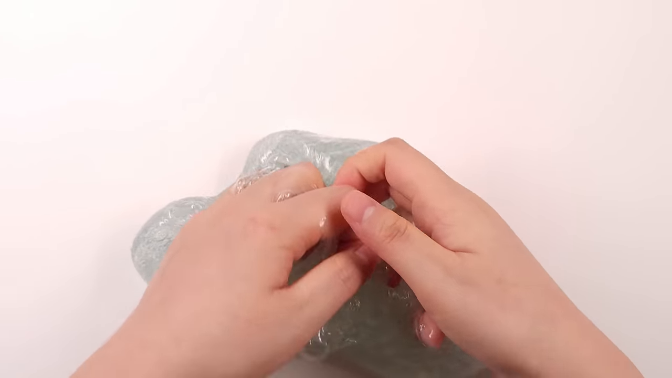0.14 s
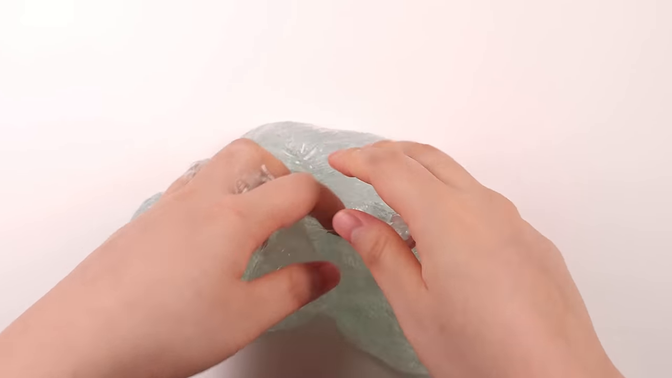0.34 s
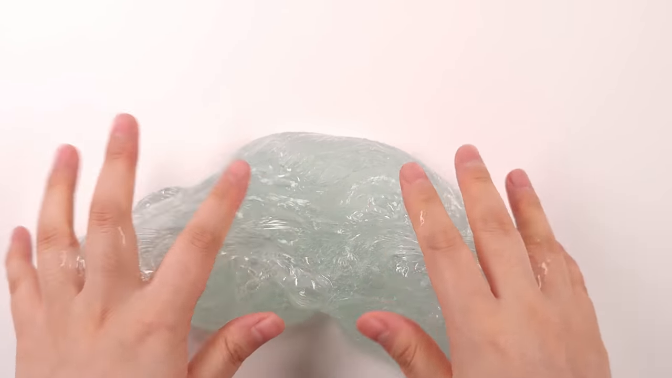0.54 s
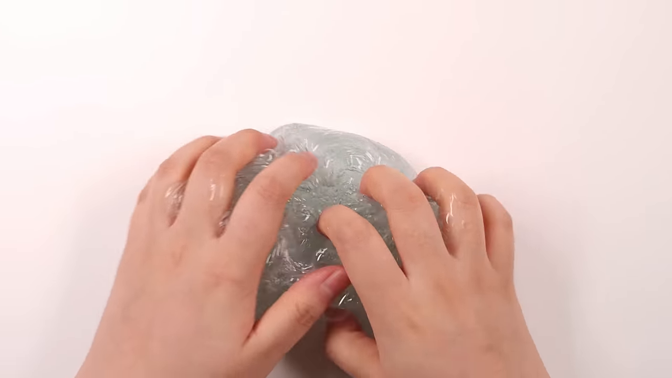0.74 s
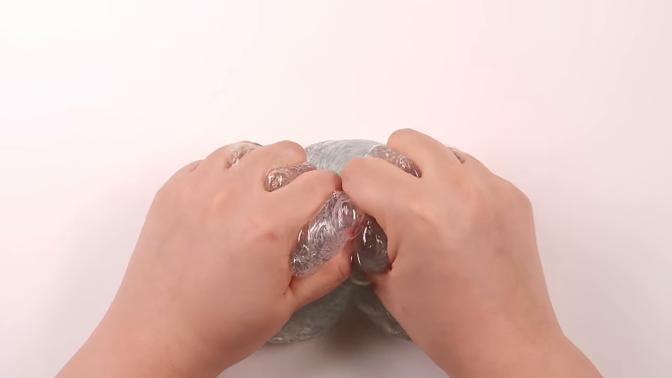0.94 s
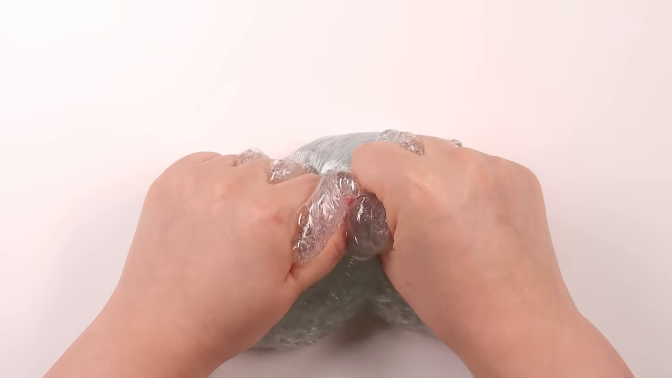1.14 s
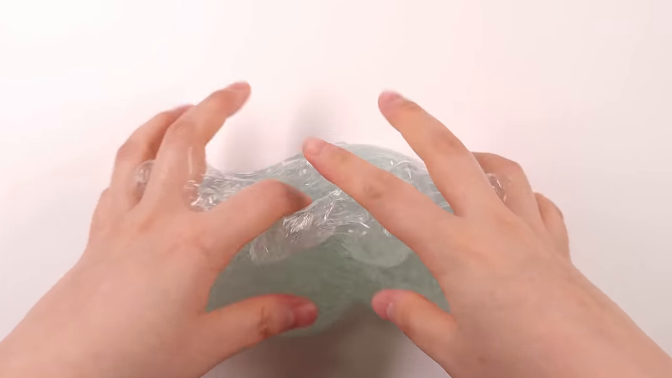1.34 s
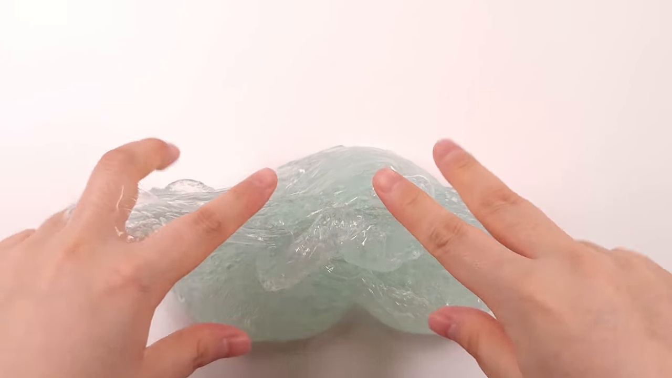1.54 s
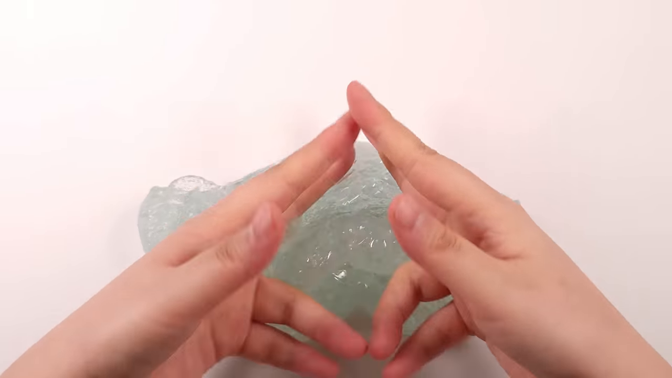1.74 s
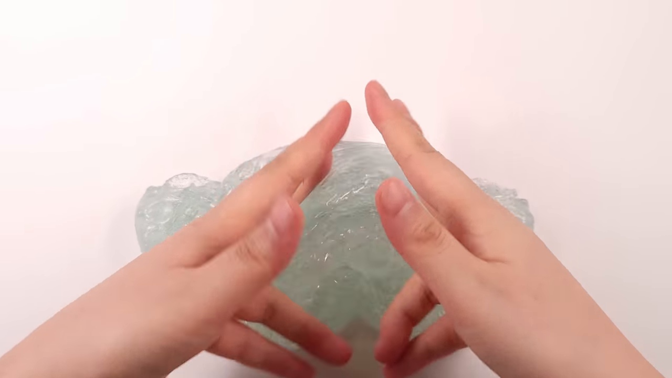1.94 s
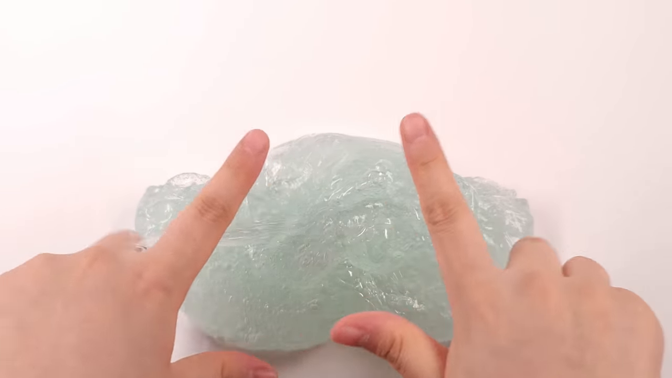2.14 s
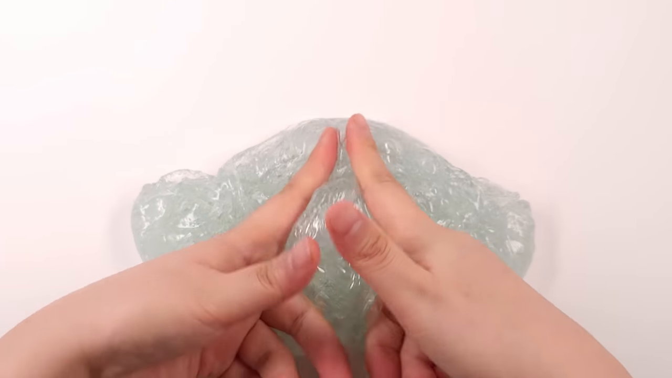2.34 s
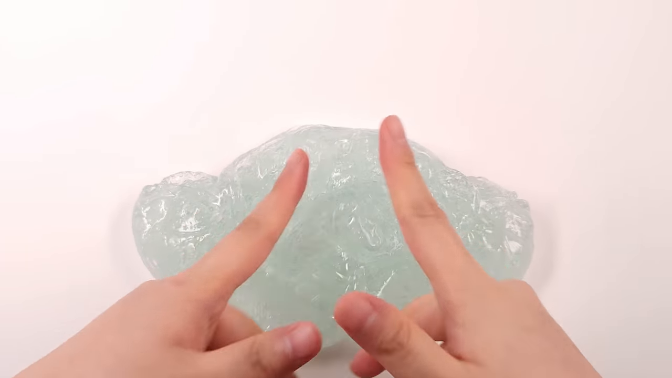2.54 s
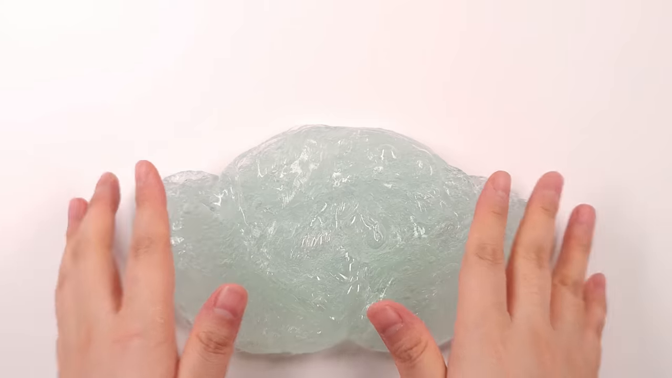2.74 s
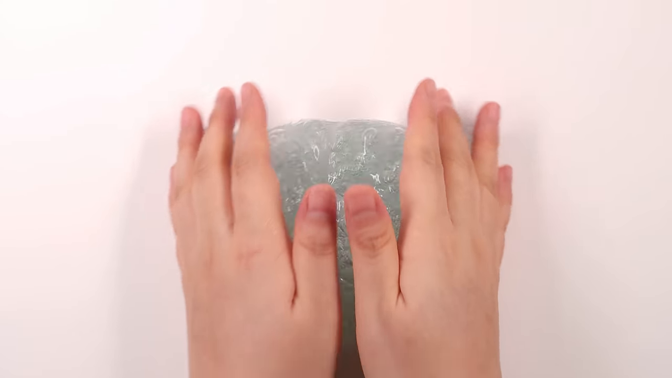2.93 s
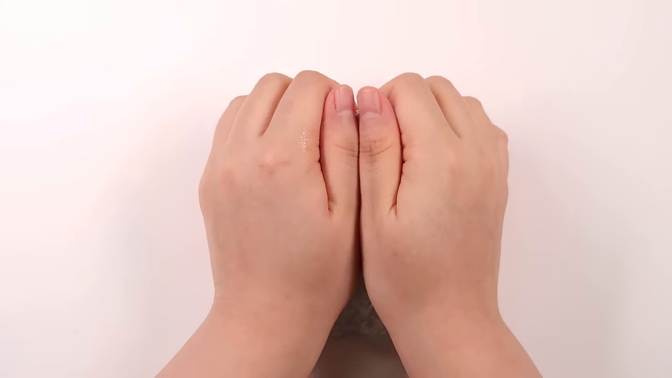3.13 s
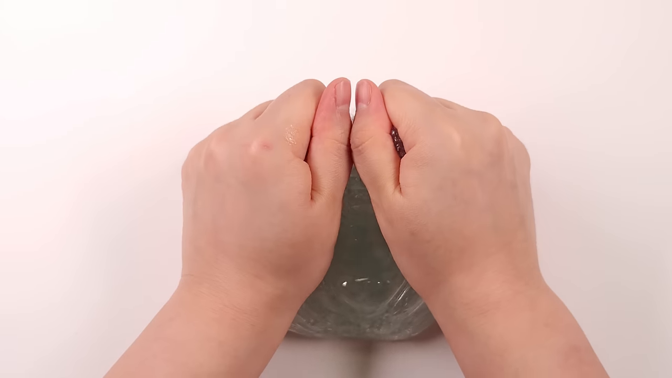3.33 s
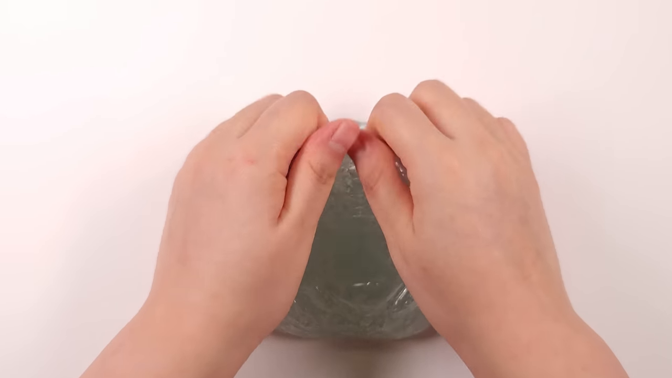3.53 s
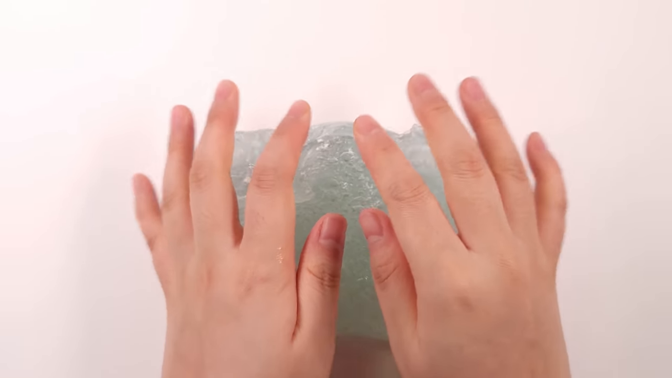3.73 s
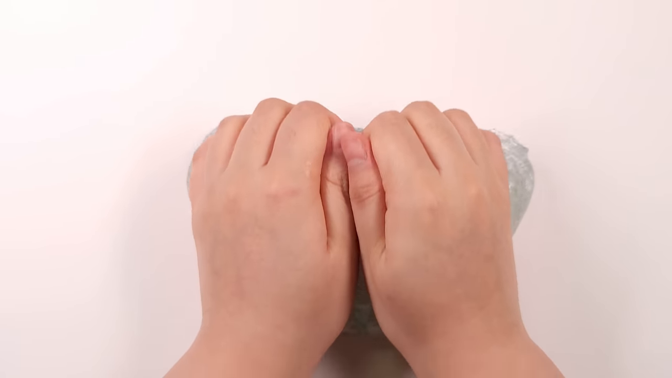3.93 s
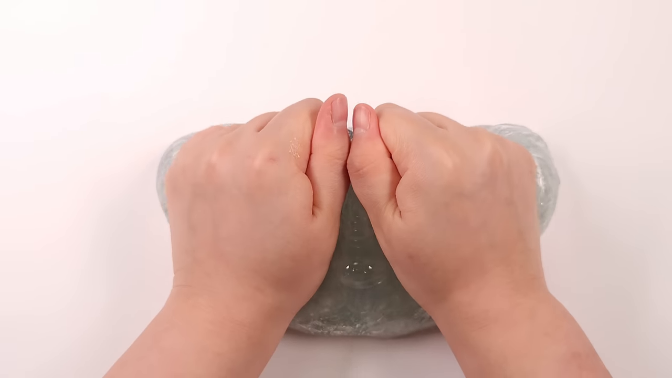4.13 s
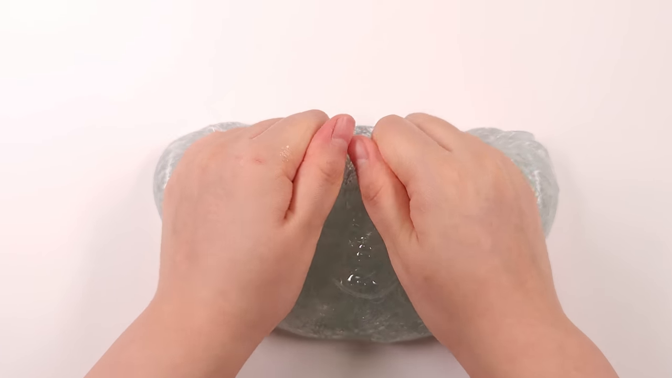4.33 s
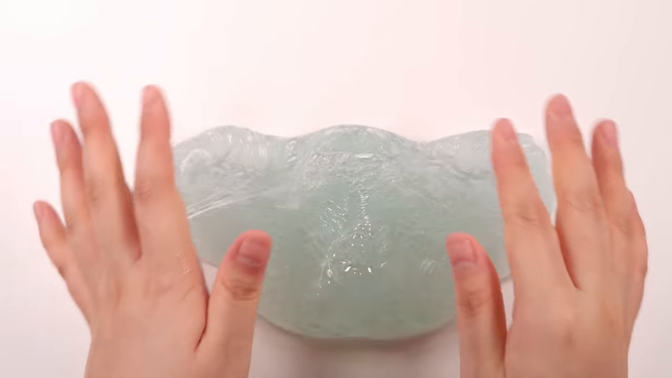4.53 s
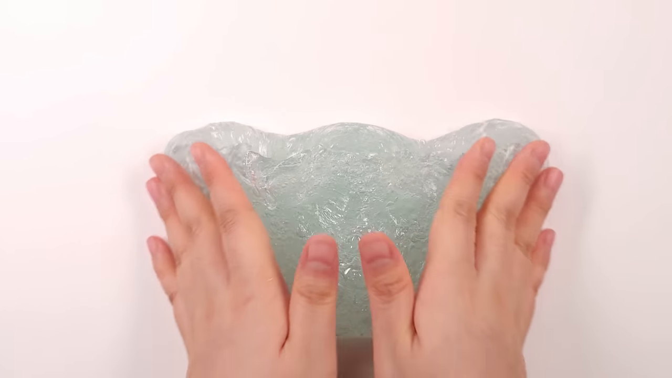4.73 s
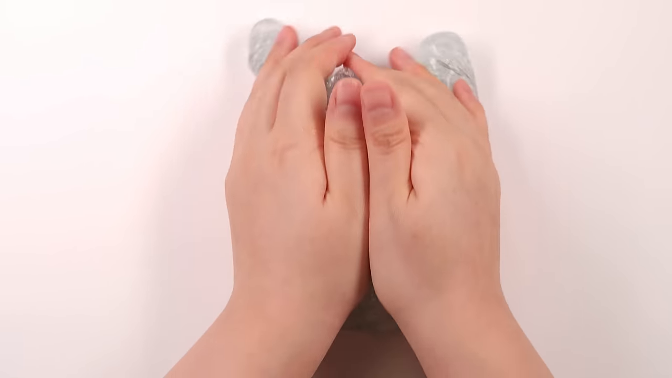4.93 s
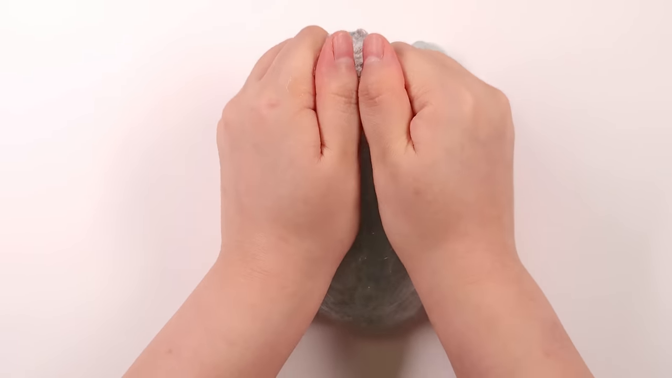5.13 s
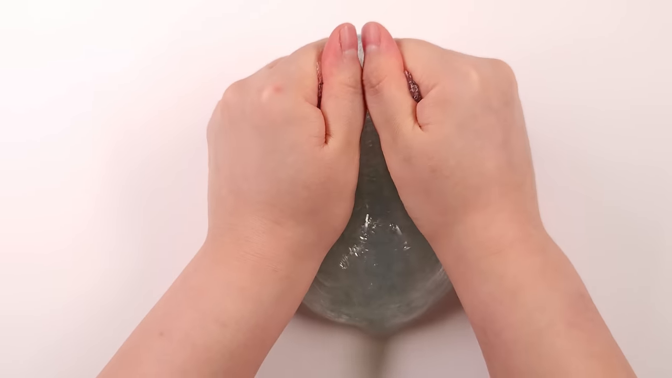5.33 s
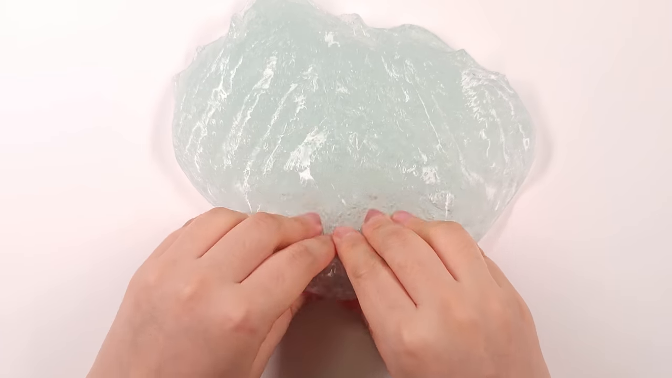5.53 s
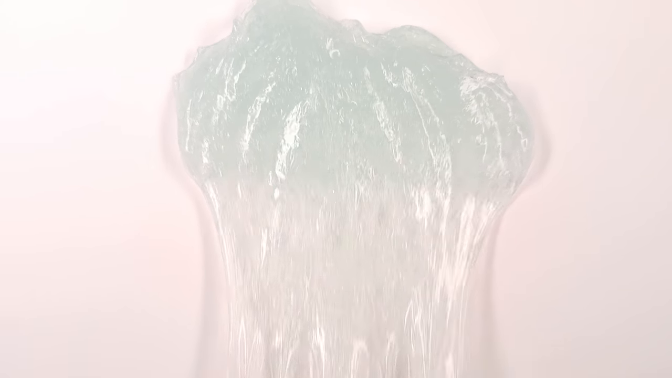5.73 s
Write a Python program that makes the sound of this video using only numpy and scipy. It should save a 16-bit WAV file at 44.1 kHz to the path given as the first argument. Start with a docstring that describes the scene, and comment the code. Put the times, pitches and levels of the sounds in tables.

```python
"""On a table in a small quiet room, two hands squeeze, fold and stretch sticky slime close to the microphone.
Trapped air bursts in sharp pops and squirts: a short snap or a run of flaps sets a small air cavity ringing.
Countless random tiny bubbles and threads crackle as the fingers sink in and peel off.
Large air pockets give soft low thuds, and the mass rumbles and rustles as it shifts under the palms.
Near the end the sound breaks off abruptly, then resumes for the last stretch, over a steady faint room hush."""
import sys
import numpy as np
from scipy import signal
from scipy.fft import rfft, irfft
from scipy.io import wavfile
from scipy.ndimage import uniform_filter1d

SR = 44100
rng = np.random.default_rng(int(sys.argv[2]) if len(sys.argv) > 2 else 0)


def wrap_up_sound(samples):
    """Save the sound to the file named by the first command line argument, as 16-bit audio."""
    columns = np.atleast_2d(samples).T
    # keep every value between -1 and 1, then stretch to whole-number steps
    tamed = np.clip(columns, -1, 1)
    steps = np.round(tamed * 32767).astype(np.int16)
    wavfile.write(sys.argv[1], SR, steps)


N = 258867
TIME = np.arange(N) / SR
BREAK_S, RESUME_S = 5.413, 5.43  # all but the hush breaks off, then resumes
EDGE_HZ = 16050  # upper limit of the sound


def gain_of(db):
    """Turns decibels into amplitude."""
    return 10 ** (np.asarray(db) / 20)


def evened(x):
    """Scales a sound to an average strength (rms) of 1."""
    return x / np.sqrt(np.mean(x ** 2) + 1e-20)


def per_ms(x):
    """Scales a click to the energy of one millisecond at rms 1."""
    return x / np.sqrt(np.sum(x ** 2) / (SR / 1000) + 1e-20)


def read(points, hz):
    """Reads between the points of a table, with pitch spaced as the ear hears it (log frequency)."""
    f, value = np.transpose(points)
    return np.interp(np.log(hz + 1), np.log(f + 1), value)


def coloured(x, points):
    """Makes each pitch range louder or softer, following a table of (frequency [Hz], level [dB])."""
    gains = gain_of(read(points, np.fft.rfftfreq(len(x), 1 / SR)))
    return irfft(rfft(x) * gains, len(x))


def high_pass(x, hz):
    """Takes away the bass below hz."""
    return signal.lfilter(*signal.butter(2, hz, "high", fs=SR), x)


def add(mix, s, sound):
    """Adds a sound into the mix at time s, cut where the mix ends."""
    part = mix[max(round(s * SR), 0):][:len(sound)]
    part += sound[:len(part)]


# colour of the still room: (frequency [Hz], relative level [dB])
HUSH_COLOUR = [(15, -27.5), (32, 3), (58, -6.5), (80, 7.5), (114, -6.5), (300, -28), (863, -31),
               (2110, -37), (3520, -27.5), (5200, -25.5), (7500, -36), (16000, -40)]


def hush(level_db=-61.5):
    """Low rumble and faint hiss of the still room: steady noise, strongest in the bass."""
    return gain_of(level_db) * evened(coloured(rng.standard_normal(N), HUSH_COLOUR))


# every movement swells from ENTRY_DB below its level, sags while held and dies away as the slime settles
ENTRY_DB, SAG_DB_PER_S, RELEASE_DB_PER_S = -25, 30.5, 273.5
# a much fainter, slower fade follows each movement
SETTLE_DB, SETTLE_DB_PER_S = -33.5, 109.5


def movement(start, swell_s, hold_s, db):
    """Power of one hand movement over time: swell, hold, release, faint settling."""
    t = TIME - start
    since_release = np.maximum(t - swell_s - hold_s, 0)
    rise_db = ENTRY_DB * np.maximum(1 - t / max(swell_s, .001), 0)
    sag_db = -SAG_DB_PER_S * np.maximum(t - swell_s, 0)
    settling_db = SETTLE_DB - SETTLE_DB_PER_S * since_release
    release_db = np.maximum(-RELEASE_DB_PER_S * since_release, settling_db)
    level_db = np.maximum(db + rise_db + sag_db + release_db, -150)
    # a movement begun before the break stops there
    sounding = (t > 0) & ((TIME < BREAK_S) | (start > BREAK_S))
    return sounding * gain_of(level_db) ** 2


# fingers sinking in or peeling off: (start [s], swell [s], hold [s], relative level [dB],
# brightness [dB], share of low squelch [dB])
FINGER_STROKES = [(0.002, 0.0012, 0.0064, -52.5, -4.5, 0), (0.173, 0.018, 0.17, -62, -2.5, -2),
                  (0.308, 0.16, 0.062, -38.5, -2, 0.5), (0.611, 0.043, 0.017, -48, 2, -4),
                  (0.802, 0.046, 0.16, -55.5, 1.5, -5.5), (0.989, 0.039, 0.003, -26, -2.5, -16.5),
                  (1.064, 0.027, 0.085, -39.5, 3, -12.5), (1.168, 0.014, 0.0059, -35.5, -4.5, 1),
                  (1.209, 0.0043, 0.0058, -35, -6, -4.5), (1.313, 0.036, 0.038, -35.5, -2, -5.5),
                  (1.367, 0.042, 0.01, -33, -3.5, 4), (1.432, 0.024, 0.067, -44.5, 1, -1.5),
                  (1.902, 0.01, 0.0069, -48.5, -4, 4.5), (2.018, 0.049, 0.029, -45.5, 2.5, -4),
                  (2.453, 0.013, 0.02, -48.5, -4, 6.5), (2.572, 0.054, 0.029, -41.5, 0.5, -5.5),
                  (2.82, 0.019, 0.015, -57.5, -2.5, 2), (3.032, 0.002, 0.03, -35.5, 0, -8.5),
                  (3.08, 0.029, 0.0051, -32, 4, -5.5), (3.157, 0.041, 0.072, -36, 0.5, -10),
                  (3.31, 0.008, 0.075, -35, 0, -7.5), (3.404, 0.025, 0.0068, -27, 0.5, -11.5),
                  (3.467, 0.0068, 0.067, -41.5, 11, -18.5), (3.609, 0.056, 0.069, -37.5, 0, -0.5),
                  (4.01, 0.029, 0.037, -55.5, -0.5, -4), (4.109, 0.0018, 0.005, -39, -5.5, -1.5),
                  (4.138, 0.0056, 0.074, -47.5, -4.5, 1), (4.208, 0.0017, 0.012, -32, -2, 3),
                  (4.25, 0.0079, 0.022, -28.5, -2.5, -11.5), (4.29, 0.013, 0.018, -41, -4, -8.5),
                  (4.44, 0.041, 0.1, -39.5, 0, 0), (4.895, 0.15, 0.019, -39, -4.5, 4.5),
                  (5.118, 0.0042, 0.091, -43.5, -1, 1), (5.244, 0.003, 0.026, -37.5, -2, -1),
                  (5.624, 0.0028, 0.015, -52.5, 2, 13), (5.664, 0.069, 0.073, -41.5, -1, 5)]
# when the fingers are lifted and the crackle is still: (lifted [s], back [s])
FINGERS_LIFTED = [(1.55, 1.9), (2.18, 2.43)]


def kneading(resting_db=-73.5, large_tilt=1.0, small_tilt=0.049):
    """Strength of squelch, large bubbles, small bubbles and fizz; bright strokes favour the finest bubbles."""
    lifted = sum((TIME > up) & (TIME < down) for up, down in FINGERS_LIFTED)
    # resting fingers keep a very faint crackle going
    power = np.full((4, N), gain_of(resting_db) ** 2)
    for start, swell_s, hold_s, db, bright_db, low_db in FINGER_STROKES:
        shares_db = [low_db, -large_tilt * bright_db, small_tilt * bright_db, bright_db]
        shares = gain_of(shares_db) ** 2
        power += shares[:, None] * movement(start, swell_s, hold_s, db)
    touching = 1 - uniform_filter1d(lifted * 1., size=1024)
    return np.sqrt(power) * touching


def clumps(smoothing_s=0.0038, depth_db=2):
    """Quick random surges and lulls as the skin sticks and slips, shared by bubbles of all sizes."""
    size = round(smoothing_s * SR)
    surge = uniform_filter1d(rng.standard_normal(N), size)
    surge = evened(uniform_filter1d(surge, size))
    return evened(gain_of(depth_db * surge))


def ring(hz, q, size=4096, glide=0.064):
    """An air cavity that swells as it opens and dies away in q cycles or so, its pitch rising as it shrinks."""
    hz = min(hz, EDGE_HZ)
    cycles = hz * np.arange(size) / SR
    age = np.pi * cycles / max(q, .5)
    # the pitch glides from a little below hz to a little above
    turns = np.cumsum(1 + glide * np.tanh(age - 2)) * hz / SR
    return per_ms(cycles * np.exp(-age) * np.sin(2 * np.pi * turns))


def bursts(per_s, spread_db):
    """Random instants of bursting, most small and a few large."""
    sizes = gain_of(spread_db * np.minimum(rng.exponential(1, N), 3.6))
    return sizes * (rng.random(N) < per_s / SR)


def bubbles(low_hz, high_hz, per_s, spread_db, q, count=22):
    """Cavities of many sizes, each size bursting and ringing at its own random instants."""
    out = np.zeros(N)
    for hz in np.geomspace(low_hz, high_hz, count):
        out += signal.oaconvolve(bursts(per_s / count, spread_db), ring(hz, q))[:N]
    return evened(out)


def threads(ticks, low_hz, high_hz):
    """Threads of slime parting from the skin: tiny dry ticks, kept to one pitch range."""
    band = signal.butter(2, [low_hz, min(high_hz, EDGE_HZ)], "band", fs=SR)
    return evened(signal.lfilter(*band, ticks))


# colour of the fine crackle: (frequency [Hz], level [dB])
FINE_COLOUR = [(30, -20.5), (70, 6), (120, -1.5), (300, -1.5), (450, -9.5), (700, -4), (2200, -3),
               (4000, 4.5), (7000, 0.5), (9300, -5), (12000, 5), (16000, -4)]


def crackle(small_db=-3.5, fizz_db=0.5, thread_db=-12, stray_db=-5.0):
    """Kneading bursts bubbles of all sizes and parts sticky threads, over the slow squelch of the mass."""
    squelch, large, small, fizz = kneading() * clumps()
    ticks = bursts(per_s=590, spread_db=2.5) * rng.standard_normal(N)
    thread = gain_of(thread_db)
    # a few bubbles lie right at the surface and burst clear of the rest
    strays = small * bubbles(1000, 6700, per_s=80, spread_db=4.5, q=2.6, count=12)
    large_mix = bubbles(427, 2053, per_s=1000, spread_db=3.5, q=3.33) + thread * threads(ticks, 370, 2600)
    small_mix = bubbles(2300, 6700, per_s=1200, spread_db=1.0, q=4.4) + thread * threads(ticks, 2900, 5300)
    fizz_mix = bubbles(7400, 14000, per_s=1600, spread_db=3.5, q=1.9) + thread * threads(ticks, 7000, 16000)
    out = squelch * bubbles(115, 430, per_s=900, spread_db=3.0, q=2.43)
    out += large * large_mix
    out += gain_of(small_db) * small * small_mix
    out += gain_of(fizz_db) * fizz * fizz_mix
    return coloured(out, FINE_COLOUR) + gain_of(stray_db) * strays


def snap(low_hz, high_hz=9000, tear_s=0.0004, size=512):
    """The film gives way: one sharp pulse and a brief ragged tear, with little bass."""
    t = np.arange(size) / SR
    burst = rng.standard_normal(size) * np.exp(-t / tear_s)
    burst[2] += 1
    burst = signal.lfilter(*signal.butter(1, high_hz, fs=SR), burst)
    return per_ms(high_pass(burst, low_hz))


def scatter(echo_db, fade_s, first_s=0.00054, size=600):
    """The direct path and a spray of echoes from the nearby hands, new for each pose."""
    t = np.arange(size) / SR
    hits = (rng.random(size) < .2) * (t > first_s)
    taps = rng.standard_normal(size) * hits * np.exp(-t / fade_s)
    taps *= gain_of(echo_db) / (np.linalg.norm(taps) + 1e-12)
    taps[0] = 1
    return taps


# bubbles bursting loudly enough to stand out: (time [s], relative level [dB], middle pitch [Hz],
# ring sharpness Q, of which the ring uses at least 0.5)
LOUD_POPS = [(0.0097, -28.5, 1400, 0.3), (0.1886, -30.5, 720, 1.8), (0.2507, -39, 1690, 1),
             (0.3087, -40.5, 1500, 0.37), (0.378, -26, 2700, 1.35), (0.404, -28, 8050, 4.7),
             (0.414, -38.5, 1800, 1.2), (0.4344, -18.5, 7500, 2), (0.5287, -31.5, 5300, 4.4),
             (0.578, -31.5, 4200, 0.86), (0.6014, -29.5, 2120, 0.84), (0.691, -34, 3400, 2.6),
             (0.873, -33.5, 4170, 2.1), (0.9456, -16, 12500, 2.4), (0.986, -11.5, 6230, 0.54),
             (0.9955, -2.5, 8050, 0.21), (1.016, -10.5, 2860, 0.71), (1.056, -11, 5560, 2.9),
             (1.064, -16, 4200, 3), (1.0831, -11.5, 5240, 1), (1.1, -13, 13400, 5.2),
             (1.1028, -10.5, 12000, 3.6), (1.1271, -14.5, 10000, 1.5), (1.139, -8, 5640, 1.34),
             (1.163, -15, 9400, 0.95), (1.168, -16.5, 3720, 1.1), (1.1846, -22, 3750, 0.66),
             (1.219, -11.5, 12500, 3.2), (1.2197, -13.5, 3000, 1.8), (1.25, -26.5, 1480, 1.5),
             (1.3421, -20, 3500, 1.3), (1.358, -25, 3920, 3.5), (1.4132, -19.5, 2960, 1.8),
             (1.4152, -19.5, 4450, 3.8), (1.537, -28.5, 3700, 3.5), (1.9116, -30, 6330, 1.7),
             (1.9322, -22.5, 12000, 1.55), (2.4574, -21.5, 6300, 0.55), (2.6742, -26.5, 3640, 0.55),
             (3.0315, -7, 5200, 0.72), (3.1878, -22, 2960, 1.3), (3.197, -14.5, 3470, 1.7),
             (3.1992, -15, 11800, 3.4), (3.2107, -15.5, 2460, 2), (3.2274, -15.5, 3060, 1.3),
             (3.2362, -18.5, 2850, 1.2), (3.249, -17.5, 3220, 1.3), (3.2605, -8, 3100, 1.6),
             (3.2857, -17, 4320, 0.54), (3.3046, -9.5, 3800, 1.5), (3.3046, -18, 1000, 0.93),
             (3.32, -13.5, 4660, 2.3), (3.323, -8.5, 12300, 9.3), (3.3297, -17, 4260, 4.5),
             (3.3328, -14.5, 11100, 6.5), (3.3427, -9, 2950, 0.61), (3.3522, -15, 4210, 1.2),
             (3.3758, -10, 4500, 0.7), (3.4087, -16.5, 4150, 0.63), (3.413, -14.5, 4700, 0.81),
             (3.417, -11.5, 11000, 1.4), (3.4341, -11.5, 7750, 1.3), (3.4469, -8.5, 6850, 0.33),
             (3.46, -11, 12100, 5.4), (3.4724, -9, 5900, 2.6), (3.4786, -8, 9080, 1.2),
             (3.5034, -12, 9600, 1.2), (3.5192, -9.5, 6170, 4.2), (3.5254, -17.5, 12200, 5.3),
             (3.6677, -24, 4100, 1.2), (3.948, -42, 10100, 0.77), (4.0305, -22.5, 4270, 1.9),
             (4.0425, -13, 12200, 5.7), (4.1072, -16, 4630, 1.7), (4.1511, -22.5, 6540, 0.45),
             (4.1563, -21.5, 3200, 0.4), (4.179, -10, 10400, 1.4), (4.205, -16.5, 11400, 2),
             (4.263, -17, 7500, 4.2), (4.2714, -10.5, 2920, 0.78), (4.318, -16, 11200, 1.5),
             (4.329, -15, 12000, 2.8), (4.3405, -14.5, 9500, 1.1), (4.8557, -39, 4370, 1.1),
             (4.9185, -37, 9300, 0.43), (5.025, -24.5, 3030, 0.41), (5.0567, -19.5, 6370, 1.5),
             (5.0673, -22.5, 14100, 0.77), (5.1103, -7.5, 4080, 2.05), (5.1771, -20.5, 7660, 0.62),
             (5.1956, -19, 14080, 1.8), (5.2395, -12, 4220, 1.56), (5.2505, -22, 2600, 0.41),
             (5.266, -16.5, 8600, 0.32), (5.2853, -16, 11400, 2.3), (5.2995, -20, 10800, 1.6),
             (5.3546, -19, 11240, 0.8), (5.3912, -15, 7880, 5.8), (5.3912, -16, 3000, 0.69),
             (5.6288, -6.5, 13060, 2.9), (5.7303, -30.5, 5700, 0.53), (5.8452, -24, 8050, 0.24)]


def pops(ring_db=0.5, snap_db=-13, open_db=-15, muffling=0.3, depth_db=2.5, shallow_hz=7000):
    """Each bubble snaps open and its cavity rings; the fingers and table scatter it at once."""
    out = np.zeros(N)
    for s, db, hz, q in LOUD_POPS:
        pop = gain_of(db + ring_db) * ring(hz, q, size=1024)
        add(pop, 0, gain_of(db + snap_db) * snap(low_hz=min(hz, 6000)))
        # faint pops and large, low ones lie deeper in the mass, so more of their sound arrives by detours
        faint_db = muffling * max(open_db - db, 0)  # extra dB of echo for each dB that a pop is fainter
        large_db = depth_db * max(np.log2(shallow_hz / hz), 0)  # extra dB of echo per octave lower
        paths = scatter(echo_db=-7.5 + faint_db + large_db, fade_s=0.0023)
        add(out, s, signal.fftconvolve(pop, paths / np.linalg.norm(paths)))
    return out


# air pockets collapsing under the palms: (time [s], relative peak level [dB], middle pitch [Hz])
AIR_POCKETS = [(0.01, -30, 227), (0.479, -23.5, 86), (0.486, -22.5, 240), (0.771, -27, 142),
               (0.809, -31.5, 173), (0.877, -34.5, 175), (1.024, -21, 149), (1.221, -21.5, 580),
               (1.411, -20, 257), (2.714, -29, 177), (2.961, -37.5, 286), (2.977, -24.5, 162),
               (2.99, -27, 250), (3.261, -24, 290), (3.304, -20, 485), (4.211, -14.5, 201),
               (4.787, -40.5, 291), (4.838, -33.5, 232.5), (5.529, -25.5, 111), (5.552, -34.5, 234),
               (5.733, -26.5, 447)]


def thuds(lowest_hz=76):
    """Large pockets of air ring low and briefly, heavily damped by the slime."""
    out = np.zeros(N)
    for s, db, hz in AIR_POCKETS:
        thud = ring(hz, q=1.3)
        add(out, s, gain_of(db) * thud / abs(thud).max())
    return high_pass(out, lowest_hz)


# air squirting out through a flapping film: (time [s], length [s], relative level [dB], middle pitch [Hz],
# ring sharpness Q)
AIR_SQUIRTS = [(0.436, 0.0061, -31, 4300, 1.5), (0.663, 0.016, -44, 2100, 1.3),
               (0.853, 0.051, -48, 3700, 4.4), (0.862, .008, -36.5, 4060, 5.8),
               (1.024, 0.0029, -12, 3800, 2.5), (1.147, 0.015, -26.5, 6000, 1.6),
               (2.056, 0.01, -30, 4370, 4.1), (2.71, 0.009, -31, 730, 0.71),
               (2.966, 0.022, -51.5, 520, 1.3), (3.0262, 0.0017, -32, 7050, 0.66),
               (3.053, 0.0038, -22.5, 4800, 2.6), (3.106, 0.016, -26, 6900, 1.5),
               (3.304, .002, -14, 11600, 5.5), (3.473, 0.0027, -10.5, 10600, 2.7),
               (4.1423, 0.0072, -23.5, 5800, 1.8), (4.207, 0.0021, -11, 2920, 0.83),
               (4.257, 0.013, -21.5, 11400, 3.2), (4.474, 0.024, -38.5, 2200, 1.2)]


def squirts(per_s=2600, spread_db=2.5):
    """A quick irregular run of bursts as the film flaps, all ringing one cavity."""
    out = np.zeros(N)
    t = TIME[:2048]
    for s, length, db, hz, q in AIR_SQUIRTS:
        sizes = rng.standard_normal(len(t)) * gain_of(spread_db * rng.standard_normal(len(t)))
        flaps = sizes * (rng.random(len(t)) < per_s / SR)
        # the flow of air rises and falls once over the squirt
        flow = np.sqrt(np.maximum(np.sin(np.pi * np.minimum(t / length, 1)), 0))
        run = signal.fftconvolve(flaps * flow, ring(hz, q))[:len(t)]
        # shorter squirts carry less energy in all
        add(out, s, gain_of(db) * evened(run) * np.sqrt(length / t[-1]))
    return out


# the mass shifting on the table under the palms: (start [s], swell [s], hold [s],
# relative level of the rumble [dB], relative level of the skin's rustle [dB])
MASS_SHIFTS = [(0.759, 0.015, 0.03, -34, -44.5), (0.86, 0.028, 0.017, -43, -53),
               (2.082, 0.035, 0.04, -43, -47.5), (2.275, 0.035, 0.096, -46, -59.5),
               (2.627, 0.046, 0.032, -30, -43.5), (2.733, 0.026, 0.15, -43.5, -52),
               (2.921, 0.036, 0.072, -32, -42), (3.76, 0.014, 0.19, -51.5, -66),
               (4.596, 0.02, 0.11, -46, -61.5), (4.781, 0.0064, 0.093, -38.5, -50),
               (5.533, 0.015, 0.068, -43.5, -51)]
# colour of skin rubbing on slime: (frequency [Hz], level [dB])
RUBBING_COLOUR = [(100, -4), (300, -4), (1000, -9), (2200, -6.5), (4500, -2.5), (15000, 0)]


def shifting(rumble_db=-6, rustle_db=-5):
    """The mass bumps softly on the table, a low rumble, while the skin rubs over it in tiny random slips."""
    power = np.zeros((2, N))
    for start, swell_s, hold_s, bump_db, skin_db in MASS_SHIFTS:
        power += gain_of([[bump_db], [skin_db]]) ** 2 * movement(start, swell_s, hold_s, 0)
    bump, rub = np.sqrt(power)
    rumble = bubbles(60, 170, per_s=1400, spread_db=3.5, q=4.2, count=8)
    rumble = evened(high_pass(rumble, 52))
    slips = bursts(per_s=5500, spread_db=0.8) * rng.standard_normal(N)
    band = signal.butter(1, [170, 430], "band", fs=SR)
    rustle = evened(signal.lfilter(*band, coloured(slips, RUBBING_COLOUR)))
    return gain_of(rumble_db) * bump * rumble + gain_of(rustle_db) * rub * rustle


# the table top under the slime: (frequency [Hz], level [dB], time to fade by 60 dB [s])
TABLE_TOP = [(80, -3.5, 0.18), (144, 1.5, 0.43), (194, -8, 0.26), (273, -3, 0.14), (357, -7, 0.23),
             (563, 3, 0.069)]


def table(x):
    """The table top rings at its own pitches along with whatever presses on it."""
    out = x.copy()
    for hz, db, t60 in TABLE_TOP:
        sharpness = hz * t60 / 2.2  # a longer ring means a narrower resonance
        out += gain_of(db) * signal.lfilter(*signal.iirpeak(hz, sharpness, SR), x)
    return out


# room decay: (frequency [Hz], time to fade by 60 dB [s])
ROOM_DECAY = [(100, 0.34), (500, 0.18), (2000, 0.23), (6000, 0.13), (15000, 0.18)]


def room(x, wet_db, wall_s=0.0095, wall_db=-19, size=16384):
    """One near wall and a short diffuse tail, each band dying at its own speed."""
    taps = rng.standard_normal(size) * (rng.random(size) < .15) * (TIME[:size] > .003)
    hz, t, z = signal.stft(taps, SR, nperseg=256)
    decay = gain_of(-60 * t / read(ROOM_DECAY, hz)[:, None])
    tail = signal.istft(z * decay, SR, nperseg=256)[1]
    tail *= gain_of(wet_db) / np.linalg.norm(tail)
    add(tail, wall_s, gain_of([wall_db]))
    tail[0] += 1  # the direct sound
    # the sound breaks off, ring and all, and resumes with the last stretch
    before = signal.oaconvolve(x, tail)[:N] * (TIME < BREAK_S)
    after = signal.oaconvolve(x * (TIME > RESUME_S), tail)[:N]
    return before + after


def scene():
    """Pops and squirts are nearest to the microphone; the rest comes from under the hands, with more room."""
    near = room(table(pops() + squirts()), wet_db=-12.0)
    under = room(table(crackle() + thuds() + shifting()), wet_db=-9.5)
    return (near + under + hush())[None]


def record(dry):
    """Peaks beyond full level are cut flat, then the highest treble is filtered away."""
    clipped = np.clip(dry, -1, 1)
    low_pass = signal.firwin(255, EDGE_HZ, window=("kaiser", 9), fs=SR)
    return signal.oaconvolve(clipped, low_pass[None], "same")


dry = scene()
out = record(dry)
wrap_up_sound(out)
```